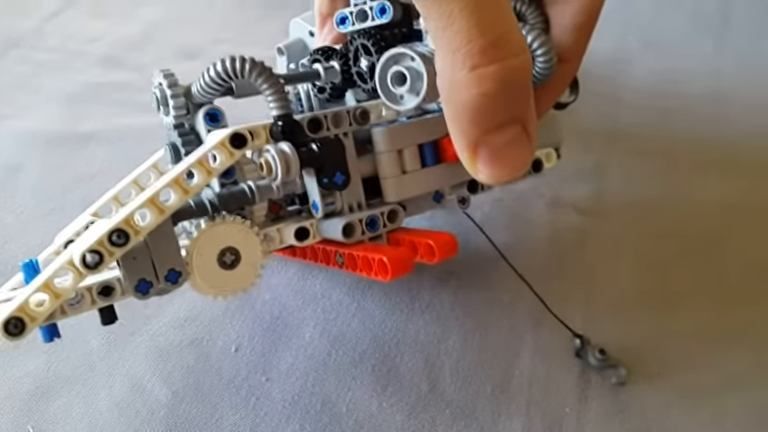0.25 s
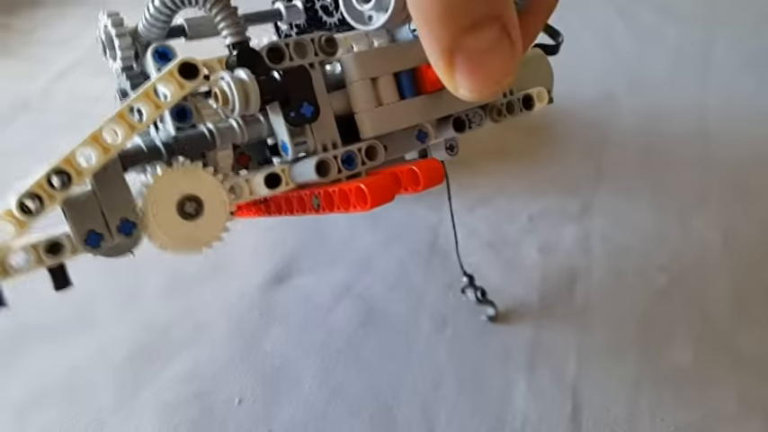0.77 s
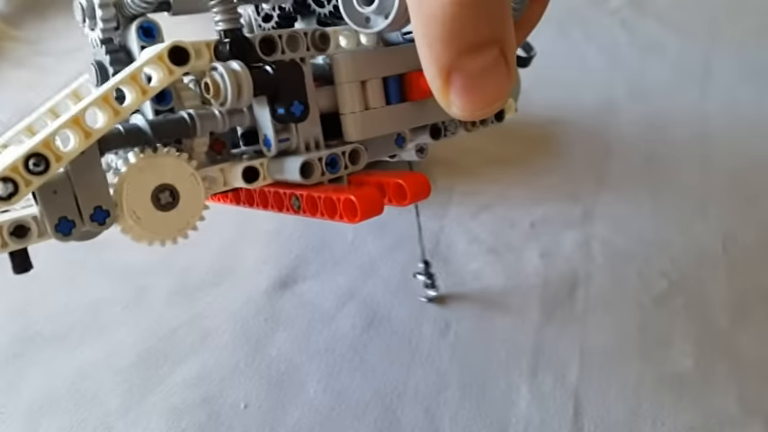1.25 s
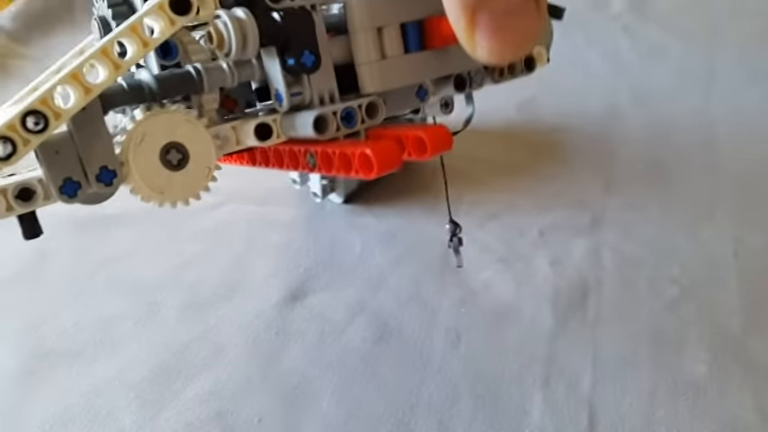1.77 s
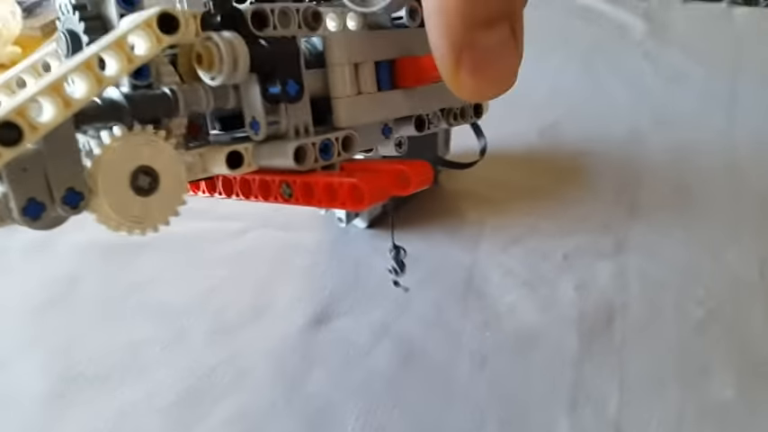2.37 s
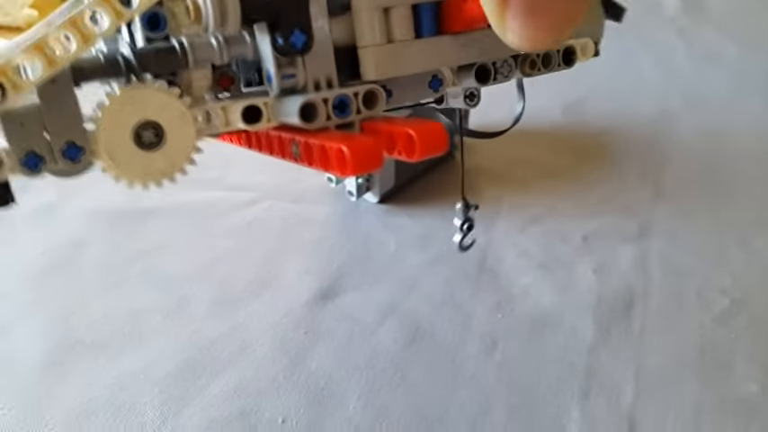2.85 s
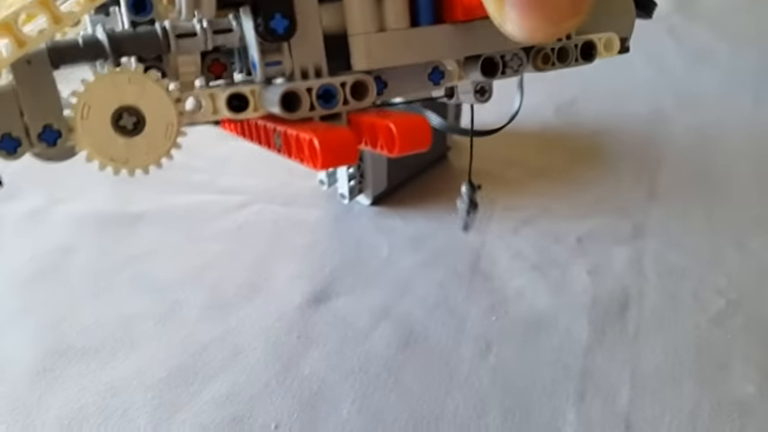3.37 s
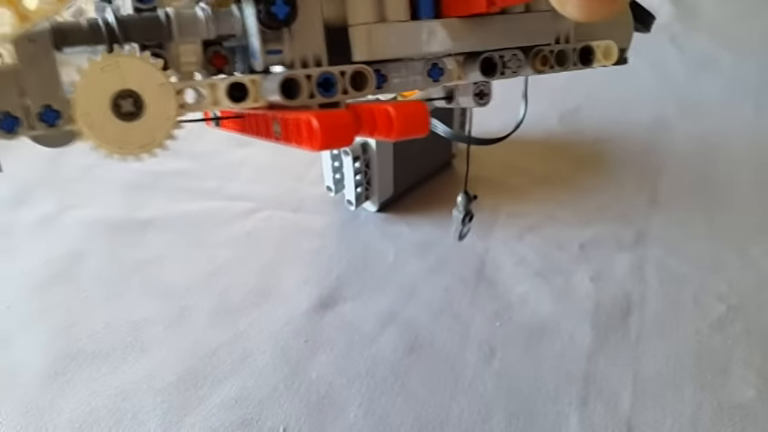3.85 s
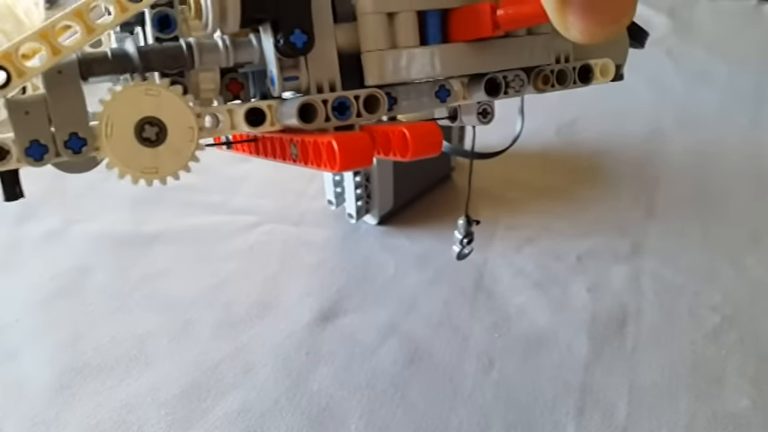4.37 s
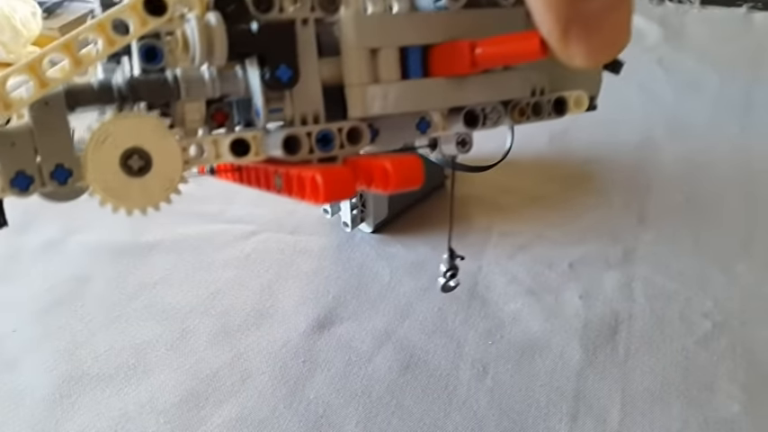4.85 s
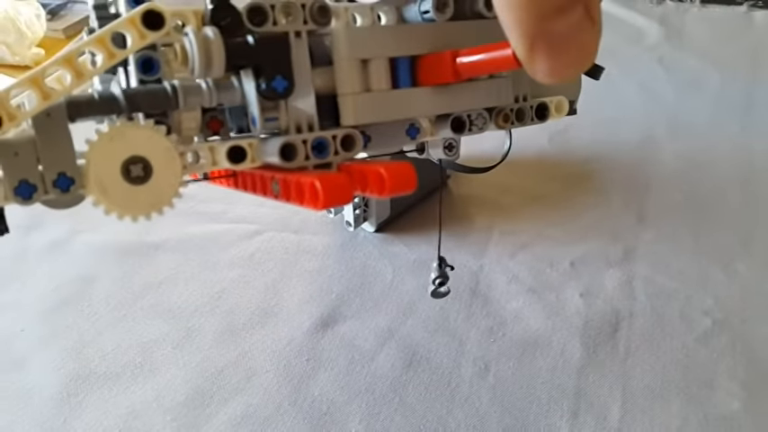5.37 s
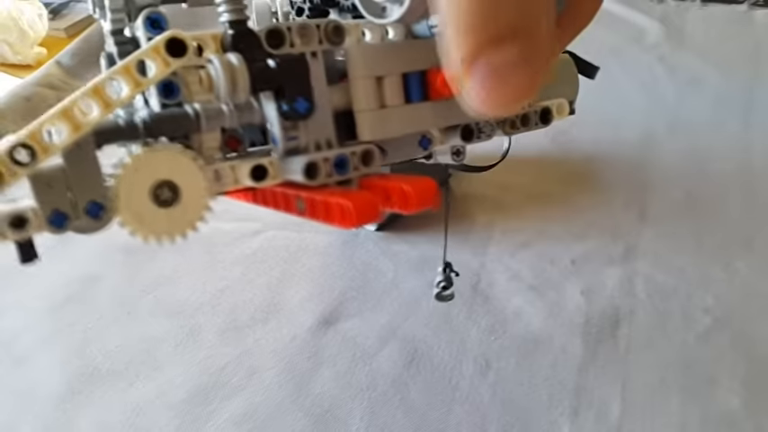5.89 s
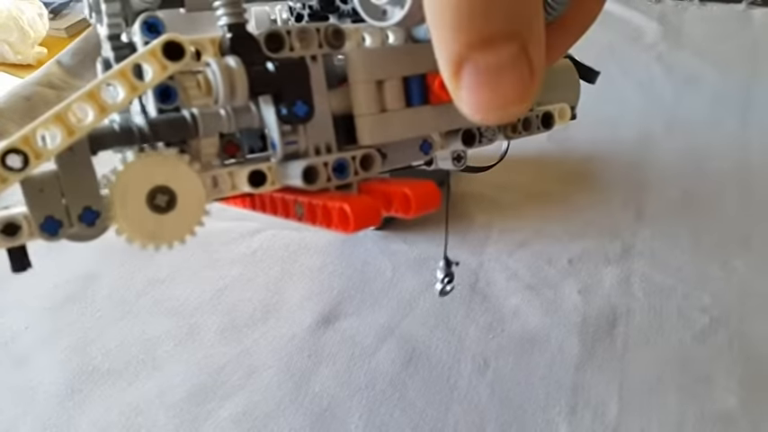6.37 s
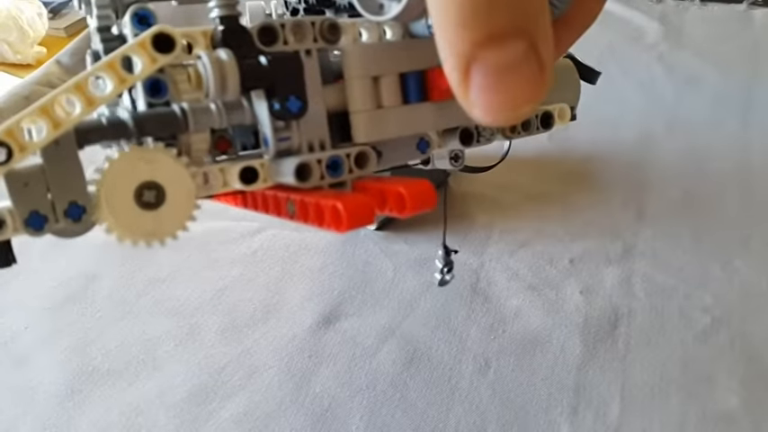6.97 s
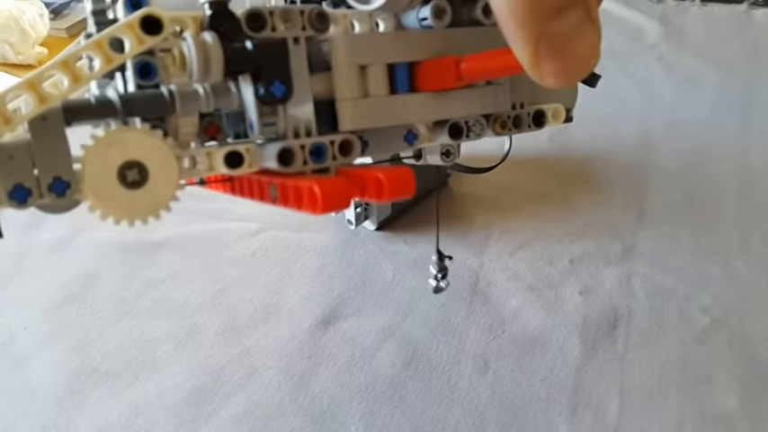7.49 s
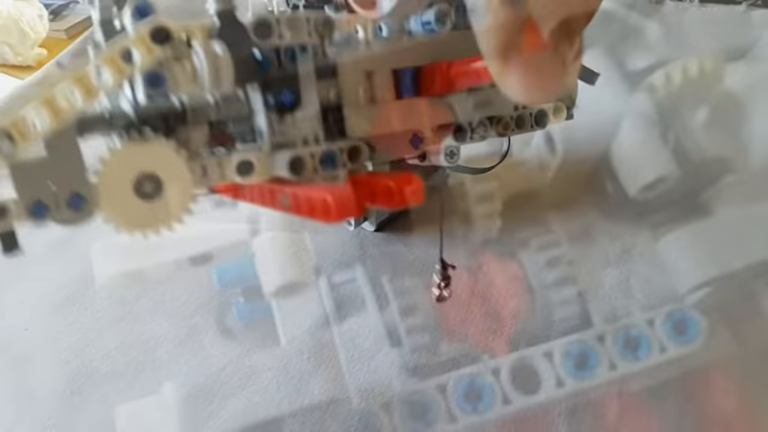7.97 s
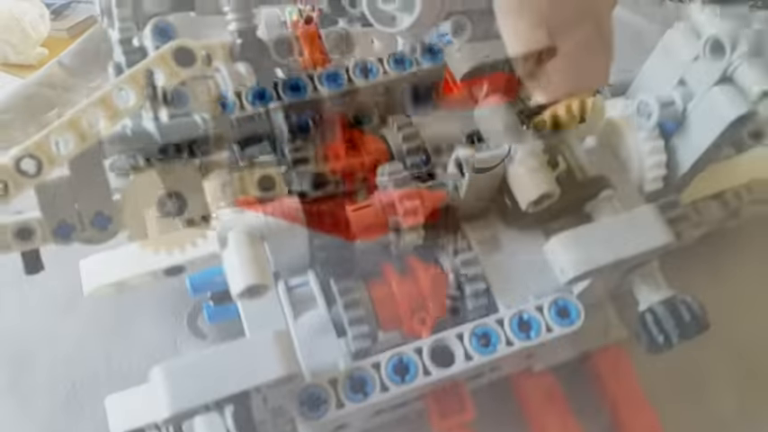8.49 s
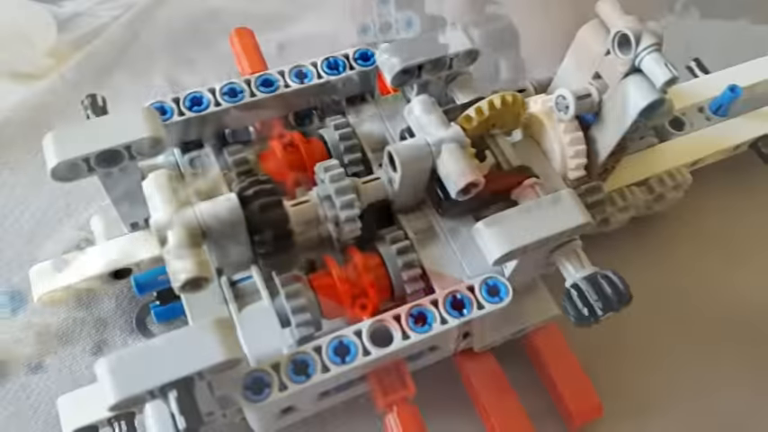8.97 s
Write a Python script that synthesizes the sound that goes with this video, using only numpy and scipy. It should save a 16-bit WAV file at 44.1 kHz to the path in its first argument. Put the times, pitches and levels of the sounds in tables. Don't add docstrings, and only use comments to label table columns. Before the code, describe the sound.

Close stereo sound of a toy gear mechanism in a quiet indoor room: a buzzy, high motor whirr with gritty plastic chatter. It changes colour early as the hand turns it, dips and recovers in pitch, binds briefly with creaky groans, and clicks as a lever shifts, most sharply past seven seconds. Then everything gradually fades over a faint rumble.

```python
import sys
import numpy as np
from scipy import signal
from scipy.fft import rfft, irfft
from scipy.io import wavfile
from scipy.ndimage import uniform_filter1d

SR = 44100
rng = np.random.default_rng(int(sys.argv[2]) if len(sys.argv) > 2 else 0)


def voltage_ratio(level):
    return 10 ** (np.asarray(level, float) / 20)


def bounce(signal):
    frames = np.transpose(np.atleast_2d(signal))
    limited = np.clip(frames, -1, 1)
    pcm = np.round(limited * 32767).astype(np.int16)
    wavfile.write(sys.argv[1], SR, pcm)


N = 407042
T = np.arange(N) / SR
FREE_HZ, SAG_HZ = 154.55, 7.5
TURNED_S = 0.4
SHAFT_LOAD_DB = -0.5

# (frequency [Hz], lead [rad])
LEAD = [(300, .2), (1000, -.2), (1600, .6), (2600, 1.1), (3800, -.6), (5700, 1.1), (6900, 2.9), (8000, 2.1),
        (16000, 2.3)]
# (time [s], frame turned toward the microphones [-1..1], brush contact [dB])
POSE = [(0, -1.1, 0.5), (.32, -0.26, 0.5), (.54, -0.56, -2), (1, -0.78, 2.5), (1.6, -1.05, 1),
        (2.2, -0.99, 3.5), (2.7, -0.94, 5.5), (3.05, -0.19, -2), (3.7, 0.14, 4.5), (4.3, 0.24, 4),
        (6.2, -0.3, 0), (7.35, -0.21, 4), (7.9, .3, 1.5), (8.6, -0.49, 3.5), (9.23, -0.25, -1)]


def unit_rms(x):
    return x / np.sqrt(np.mean(x ** 2) + 1e-20)


def read_spectrum(points, hz):
    f, value = np.transpose(points)
    return np.interp(np.log(hz + 1), np.log(f + 1), value)


def read_columns(rows, t):
    s, *rest = np.transpose(rows)
    return [np.interp(t, s, column) for column in rest]


def drift(count, hz):
    knots = rng.standard_normal((count, int(N / SR * hz) + 2))
    return [np.interp(T * hz, np.arange(len(k)), k) for k in knots]


def bumps(rows):
    t = T[::64]
    mid, length, *values = np.transpose(rows)
    after = np.where(length < .3, .36, .5)
    humps = []
    for s, d, a in zip(mid, length, after):
        phase = (t - s) / d / np.where(t > s, a, 1 - a)
        humps.append(np.cos(np.pi / 2 * np.clip(phase, -1, 1)) ** 2)
    return [np.interp(T, t, v @ np.array(humps)) for v in values]


def band(x, lo_hz, hi_hz):
    return signal.sosfilt(signal.butter(2, [lo_hz, hi_hz], "band", fs=SR, output="sos"), x)


def pair(angle, pan_db, lead):
    left = voltage_ratio(pan_db / 2) * np.cos(angle + lead)
    right = voltage_ratio(-pan_db / 2) * np.cos(angle)
    return np.array([left, right]) * np.sqrt(2)


def fade_db(t):
    from_s, end_s = 7.5, 9.465
    return 20 * np.log10(np.clip((end_s - t) / (end_s - from_s), 1e-3, 1))


def load_at(speed):
    return np.clip((FREE_HZ - speed) / SAG_HZ, 0, 1)


def phase_of(speed):
    return 2 * np.pi * np.cumsum(speed) / SR


def shaft_motion():
    # (time [s], shaft speed [Hz])
    pull = [(0, 155.4), (.36, 155.4), (.5, 148.2), (1.3, 151.7), (1.63, 151.3), (1.87, 146), (2.98, 145.3),
            (3.07, 153.8), (3.42, 155.4), (4.2, 152.4), (5.48, 155.2), (5.65, 150.5), (6.3, 148.2),
            (7.1, 155.3), (7.96, 154.8), (8.4, 149), (8.57, 155.5), (9.23, 157.3)]
    # (middle [s], length [s], speed lost [Hz], groan gained [dB])
    snags = [(.8, .8, 1.19, 1), (1.9, .12, 0.16, 7), (2.03, .1, 0.06, 4), (2.31, 0.66, -5.5, -5),
             (2.54, 0.14, 0.08, 8.5), (2.64, 0.093, 1.5, 0), (2.72, 0.11, 0.3, 10), (2.87, .13, 1.8, 10.5),
             (2.98, 0.032, 0, 10), (3.64, .14, 5, 9), (3.7, 0.087, 2.5, 3), (3.85, .2, 6, 6.5),
             (4.02, .12, -1.63, -2), (5.715, .14, 6, 11.5), (5.84, .1, 2, 6), (6.04, .16, 2, 7),
             (6.2, .2, 3.5, 11.5), (6.33, 0.1102, 1.8, 7), (6.385, 0.082, .5, 11.5), (7.24, 0.0694, 2.5, 2),
             (7.32, 0.067, 0.24, 21), (7.35, 0.075, 4.5, 4), (7.48, .17, 4, 9), (7.52, .7, 7, 1),
             (7.63, 0.1407, 1.56, 3.5), (7.85, .18, 1.74, 0), (8.14, 0.2, 7, 12), (8.29, 0.098, 2.5, 12.5)]
    sag, bind_db = bumps(snags)
    flutter = .35 * drift(count=1, hz=14)[0]
    speed = uniform_filter1d(read_columns(pull, T)[0], 2000) - sag + flutter
    return speed, bind_db


def gear_motion(speed):
    return speed + .8 * (speed - uniform_filter1d(speed, 6000))


def eased_db(speed):
    return 12 * np.clip((speed - 148.2) / 2.5, 0, 1)


def orders(table, speed, angle, loud_db, waver_db=1.0, wobble=0.51, sway=0.22):
    load = load_at(speed)
    turned = np.clip((T - TURNED_S) / .28 + .2, 0, 1)
    out, count = np.zeros((2, N)), len(table)
    wavers, slips, leans = drift(count, hz=10), drift(count, hz=29.98), drift(count, hz=1.5)
    for row, waver, slip, lean in zip(table, wavers, slips, leans):
        k, first_db, free_db, loaded_db, pan_db = row
        later_db = free_db + load * (loaded_db - free_db)
        db = first_db + turned * (later_db - first_db) + waver_db * waver
        spin = k * angle + wobble * slip + 2 * np.pi * rng.random()
        lead = read_spectrum(LEAD, k * FREE_HZ) + sway * lean
        out += voltage_ratio(db) * pair(spin, pan_db, lead)
    return out * voltage_ratio(loud_db)


def shaft_tones(speed):
    # (multiple of shaft [1], before turn [dB], running free [dB], loaded [dB], left-right [dB])
    shaft_orders = [(3, -84, -72, -79, 4), (4, -70, -71.5, -82, -6), (5, -68, -63, -68.5, 0),
                    (6, -61, -73.5, -69, 3), (7, -64, -59, -65.5, -6), (8, -55, -64, -68.5, -2),
                    (9, -63, -54, -62, -6.5), (10, -58, -61.5, -63.5, -12), (11, -53.5, -63, -64.5, -11),
                    (12, -68, -56, -63.5, -12), (13, -52.5, -63, -62.5, -5)]
    return orders(shaft_orders, speed, phase_of(speed), fade_db(T) + SHAFT_LOAD_DB * load_at(speed))


def brush_tones(speed):
    # (multiple of shaft [1], before turn [dB], running free [dB], loaded [dB], left-right [dB])
    brush_orders = [(14, -66, -64, -72, -2), (15, -66, -66, -67, -2), (21, -68, -64, -70, -2),
                    (26, -66, -63, -68, -4), (45, -55, -55, -63, 2), (48, -59, -63, -63, 6),
                    (51, -69, -63, -69, 8), (54, -62, -70, -69, 6), (60, -64, -67, -67, 2),
                    (63, -62, -62, -70, -3), (66, -63, -59, -66, 6), (69, -62, -65, -60, 5),
                    (72, -69, -67, -70, 5), (75, -59, -57, -61, 6), (78, -71, -68, -70, 2),
                    (81, -59, -59.5, -58.5, -1), (84, -71, -70, -74, -1), (87, -65, -61, -59, -1),
                    (93, -60, -66, -60.5, 0), (99, -71, -70, -72, 2)]
    jerk = uniform_filter1d(abs(np.gradient(speed)) * SR, 3000)
    chatter_db = np.minimum(.1 * jerk, 9)
    loud_db = fade_db(T) + read_columns(POSE, T)[1] - chatter_db + 1.5
    return orders(brush_orders, speed, phase_of(speed), loud_db, waver_db=3.0, wobble=.6, sway=.4)


def meshing(speed):
    # (multiple of shaft [1], before turn [dB], running free [dB], loaded [dB], left-right [dB])
    mesh_orders = [(16.7, -75, -70, -58, -0.3), (17.6, -75, -85, -60, -0.8)]
    loud_db = fade_db(T) + SHAFT_LOAD_DB * load_at(speed) - eased_db(speed)
    return orders(mesh_orders, speed, phase_of(gear_motion(speed)), loud_db, waver_db=4.0, wobble=9.05)


def casing(mode, speed, level_db):
    hz, width, noisy, pan_db, drive = mode
    r = np.exp(-np.pi * width / SR)
    poles = [1, -2 * r * np.cos(2 * np.pi * hz / SR), r * r]
    hum = signal.lfilter([1], poles, rng.standard_normal((2, N)))
    out = noisy * unit_rms(hum + .5 * hum[::-1]) * voltage_ratio([[pan_db / 4], [-pan_db / 4]])
    power = noisy ** 2
    angle = phase_of(speed)
    for (k, db), slip in zip(drive, drift(count=len(drive), hz=40.75)):
        gain = voltage_ratio(db) / (1 + ((k * speed - hz) / (width / 2)) ** 2)
        spin = k * angle + 0.18 * slip + 2 * np.pi * rng.random()
        out += gain * pair(spin, pan_db, 1.37)
        power = power + gain ** 2
    return out * voltage_ratio(level_db) / np.sqrt(power)


def casing_whine(speed):
    whine_mode = (5640, 140, .22, -13, [(36, 2), (37, -21), (39, 5)])
    # (shaft speed [Hz], half width [Hz], gain [dB])
    crossings = [(156.27, 2.05, 10.5), (146.1, 1.3, 8.5)]
    # (middle [s], length [s], gain [dB])
    sings = [(.65, 0.47, -2), (1.02, 0.34, 4), (1.97, .3, 1.5), (2.17, .2, -5), (2.5, 0.26, -3),
             (2.86, .2, 5), (3.2, 0.5, 5.5), (3.5, .3, -4), (4.39, .06, 8), (4.9, 0.98, -2.5),
             (5.4, 0.071, 2), (5.86, .1, 6), (6.15, 0.18, 6), (6.35, 0.25, 3.5), (6.8, 0.64, 4),
             (7.3, 0.061, 11), (7.5, .2, 4), (7.82, 0.26, 2), (7.94, 0.052, 2), (8.3, 0.19, 3),
             (8.5, .15, 5), (8.85, 0.48, 2), (9.11, 0.077, -13)]
    level_db = -54.5 + .86 * fade_db(T) + bumps(sings)[0]
    for hz, half_hz, db in crossings:
        level_db = level_db + db / (1 + ((speed - hz) / half_hz) ** 2)
    return casing(whine_mode, speed, level_db)


def casing_groan(speed, bind_db):
    groan_mode = (3830, 280, .55, -4.0, [(23.9, 6), (26.3, 0), (27, -9)])
    level_db = -49 + fade_db(T) + bind_db - eased_db(speed)
    return casing(groan_mode, gear_motion(speed), level_db)


def casing_boom(speed):
    boom_mode = (487, 55, 1, 0.0, [(3, 0)])
    # (middle [s], length [s], gain [dB])
    boom_swell = (.52, 0.41, 6.8)
    fall_db = 45 * np.maximum(T - 1.1, 0)
    return casing(boom_mode, speed, -65 + bumps([boom_swell])[0] - fall_db)


def tooth_contacts(angle):
    hits = rng.random((2, N)) < 5000 / SR
    sizes_db = 3.25 * np.minimum(rng.exponential(1, (2, N)), 4)
    knocks = voltage_ratio(sizes_db) * hits * rng.choice([-1, 1], (2, N))
    beat = 1 + 0.052 * np.cos(angle) + 0.19 * np.cos(2 * angle) + 0.42 * np.cos(3 * angle)
    wheel = 1 + .028 * np.cos(angle / 24)
    rub = .33 * unit_rms(knocks) + rng.standard_normal((2, N))
    return unit_rms(rub * beat * wheel * voltage_ratio(.7 * drift(count=1, hz=35)[0]))


def teeth(speed):
    # (frequency [Hz], level [dB per Hz])
    rattle = [(120, -55), (200, -19), (527, -19.5), (760, -15.5), (863, -14), (1060, -11), (1160, -9),
              (1860, -2.5), (2730, -3), (3280, -1), (5680, 1.5), (6220, -2.5), (8180, -9), (9820, -11),
              (15800, -16.5)]
    # (frequency [Hz], gain [dB])
    hollow = [(2000, 0), (2200, -3), (2950, -3.5), (3200, 0)]
    # (frequency [Hz], likeness [0-1])
    likeness = [(60, 0.45), (150, -0.066), (380, -0.28), (950, 0.47), (2380, 0.3), (5980, -0.21),
                (15000, -1.03)]
    # (frequency [Hz], left-right [dB])
    balance = [(60, 0.5), (130, 1.5), (290, 5.5), (640, 1), (1410, 3.5), (3100, -1), (6820, -1),
               (15000, 7.5)]
    hz, t, z = signal.stft(tooth_contacts(phase_of(speed)), SR, nperseg=512, noverlap=384)
    same = np.clip(read_spectrum(likeness, hz) + 0.23, 0, 1)[:, None]
    lag = np.exp(-1j * read_spectrum(LEAD, hz))[:, None]
    z[1] = (same * z[0] + np.sqrt(1 - same ** 2) * z[1]) * lag
    patches = uniform_filter1d(rng.standard_normal(z[0].shape), 6, 0)
    patches = unit_rms(uniform_filter1d(patches, 20, 1))
    shaft, tilt, fade = np.interp(t, T, speed), read_columns(POSE, t)[0], fade_db(t)
    load = load_at(shaft)
    level_db = -31.5 + .82 * load - tilt + fade
    early = np.clip((TURNED_S - t) / .2 + .5, 0, 1)
    grumble_db = 10 * early - 4 * load - .54 * fade
    body_db = 3.5 * tilt
    fizz_db = 3 * tilt - .086 * fade
    regions = [([(170, 0), (330, 1), (600, 0)], grumble_db),
               ([(600, 0), (1800, 1), (4500, 0)], body_db),
               ([(4500, 0), (9000, 1)], fizz_db)]
    colour_db = 0
    for shape, db in regions:
        colour_db = colour_db + read_spectrum(shape, hz)[:, None] * (db - np.median(db))
    free = np.clip((shaft - FREE_HZ) / 3 + 1, 0, 1)
    colour_db = colour_db - 5 * free * read_spectrum([(10500, 0), (12500, 1)], hz)[:, None]
    side_db = read_spectrum(balance, hz)[:, None] / 2 * np.array([1, -1])[:, None, None]
    frame_db = (read_spectrum(rattle, hz) + read_spectrum(hollow, hz))[:, None]
    z *= voltage_ratio(frame_db + side_db + colour_db + level_db + 1.1 * patches)
    return signal.istft(z, SR, nperseg=512, noverlap=384)[1][:, :N]


def room():
    # (frequency [Hz], level [dB per Hz])
    rumble = [(34, -33), (58, -2), (75, -4), (124, -1.5), (152, 0), (178, -4), (209, -4.5), (330, -11),
              (430, -30), (730, -120)]
    hz = np.fft.rfftfreq(N, 1 / SR)
    air = rng.standard_normal((3, N))
    air = irfft(rfft(air[:2] + .5 * air[2]) * voltage_ratio(read_spectrum(rumble, hz)), N)
    air = voltage_ratio(-66) * unit_rms(air) * voltage_ratio([[.8], [-.8]])
    hum = voltage_ratio(-77.5 + 2.7 * drift(count=1, hz=9)[0]) * pair(2 * np.pi * 47.6 * T, 0, .3)
    return voltage_ratio(.35 * fade_db(T)) * (air + hum)


def lever():
    # (time [s], peak [dB], body [dB], brightness [dB], left-right [dB])
    clicks = [(0.7687, -26, -8, -4, -4), (3.6716, -17, -19, -8, 4), (3.715, -19.5, -17, -14, 5),
              (3.8862, -16.5, -5, -8, 10), (5.6, -23, -12, -12, -7), (5.7345, -23, -3, -8, -1.5),
              (5.8544, -19.5, -10, -16, 1), (6.0063, -14.5, -7.5, -25, 8), (6.0194, -26, -11, -7, -2.0),
              (6.0628, -19, -2, -9, 1), (7.244, -18, -6, -19, 9), (7.2769, -21, -11, -8, 12),
              (7.2944, -10, -3, -18, 7), (7.349, -14.5, -19, -6, 6), (7.365, -24, -12, -9, -0.5),
              (7.3761, -18, 1, -25, 13), (7.5556, -28, -4, -15, -6), (8.1546, -24, -11, -19, -3),
              (8.2094, -18.5, -20, -29, -4), (8.4944, -34, -12, -6, -2.5)]
    out, t = np.zeros((2, N)), np.arange(1800) / SR
    envelope = np.tanh(t / .0014) * (np.exp(-(t / .005) ** 2) + .1 * np.exp(-t / .012))
    for s, peak_db, body_db, bright_db, pan_db in clicks:
        snap = rng.standard_normal((2, len(t)))
        snap = (snap + .5 * snap[::-1]) * envelope
        body = voltage_ratio(body_db) * band(snap, 1550, 3500)
        edge = voltage_ratio(bright_db) * band(snap, 4960, 11400)
        sound = band(snap, 2636, 7610) + body + edge
        part = out[:, round(s * SR):][:, :len(t)]
        part += sound / abs(sound).max() * voltage_ratio(peak_db - 6.0 + np.array([[pan_db], [-pan_db]]) / 2)
    return out


def scene():
    speed, bind_db = shaft_motion()
    motor = shaft_tones(speed) + brush_tones(speed) + meshing(speed)
    rings = casing_whine(speed) + casing_groan(speed, bind_db) + casing_boom(speed)
    return motor + rings + teeth(speed) + room() + lever()


def band_limit(x):
    return signal.sosfilt(signal.butter(12, 16750, fs=SR, output="sos"), x)


def record(dry):
    lowpass = signal.firwin(511, 15800, window=("kaiser", 9), fs=SR)
    limited = signal.oaconvolve(dry, lowpass[None], "same")
    return band_limit(limited - .0007)


dry = scene()
out = record(dry)
bounce(out)
```